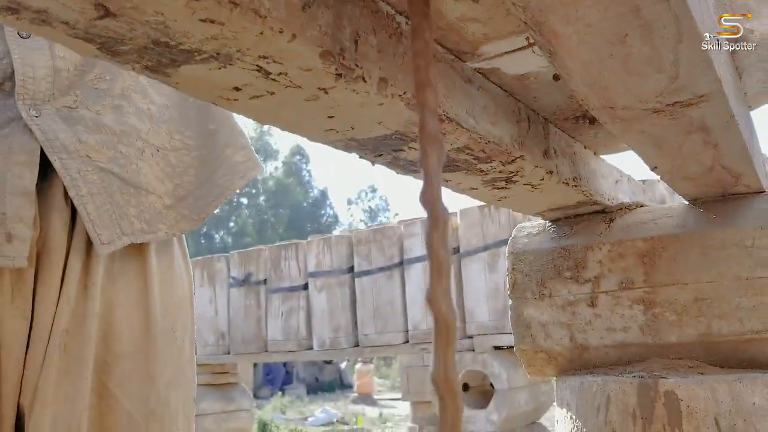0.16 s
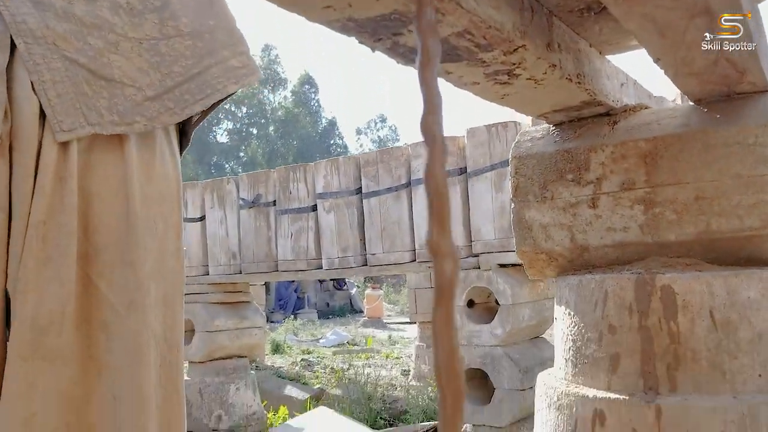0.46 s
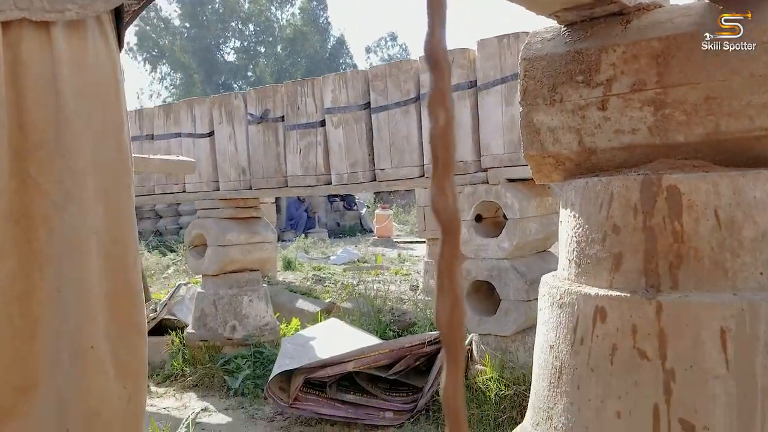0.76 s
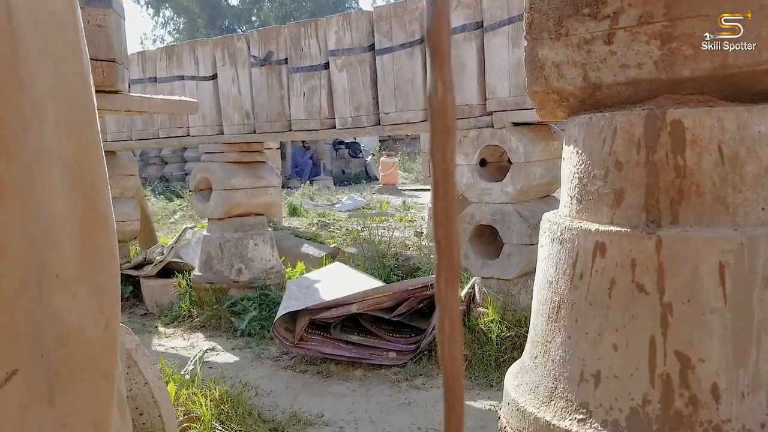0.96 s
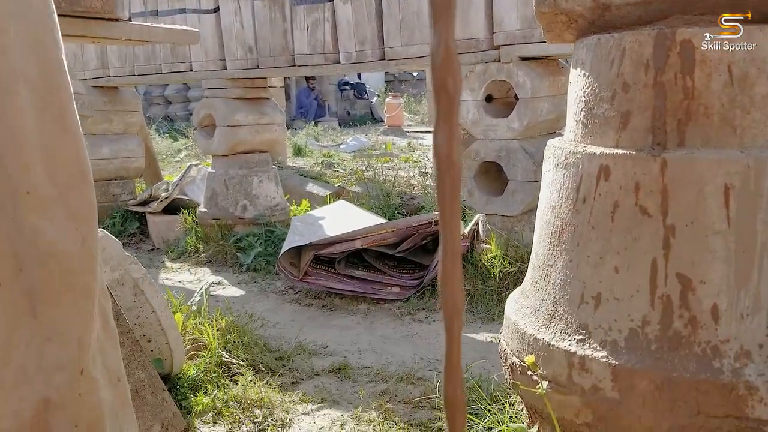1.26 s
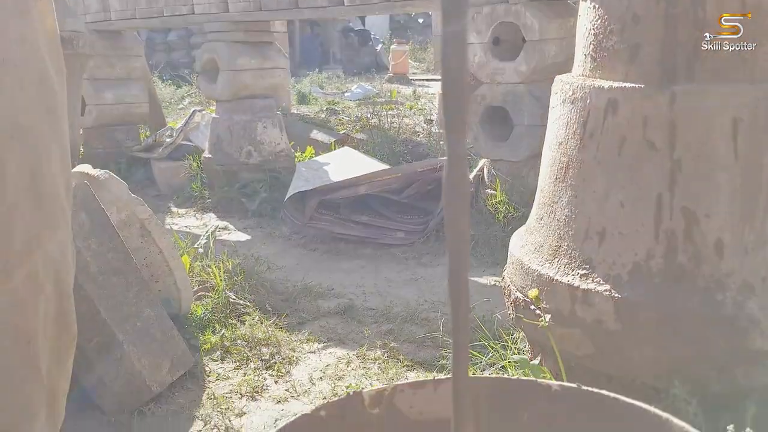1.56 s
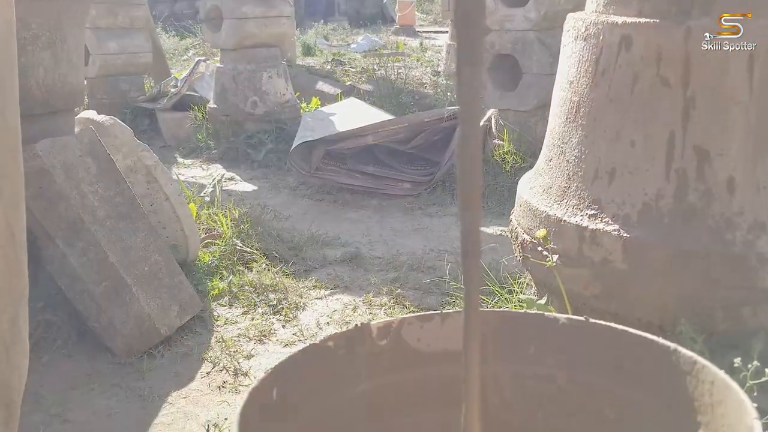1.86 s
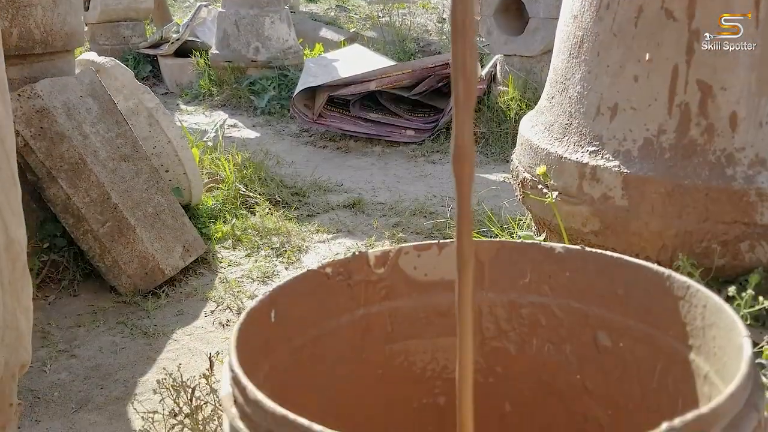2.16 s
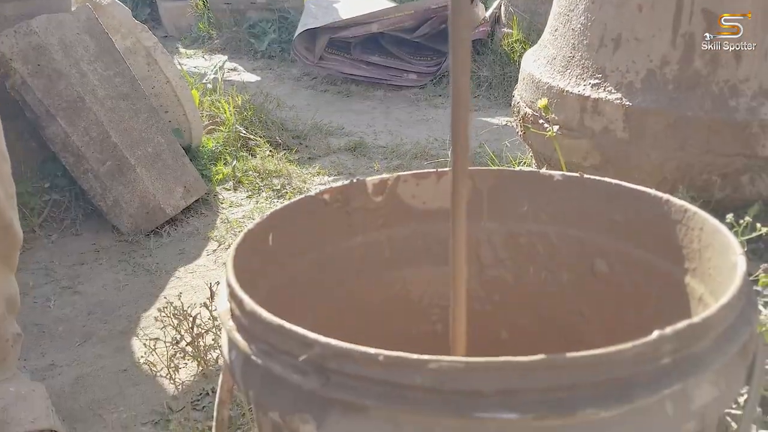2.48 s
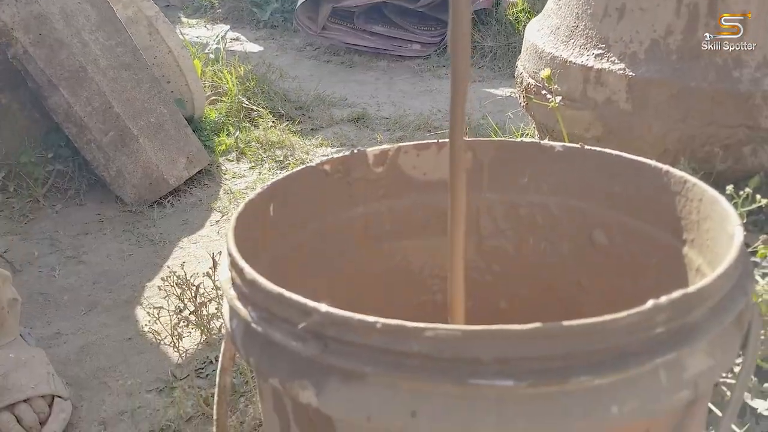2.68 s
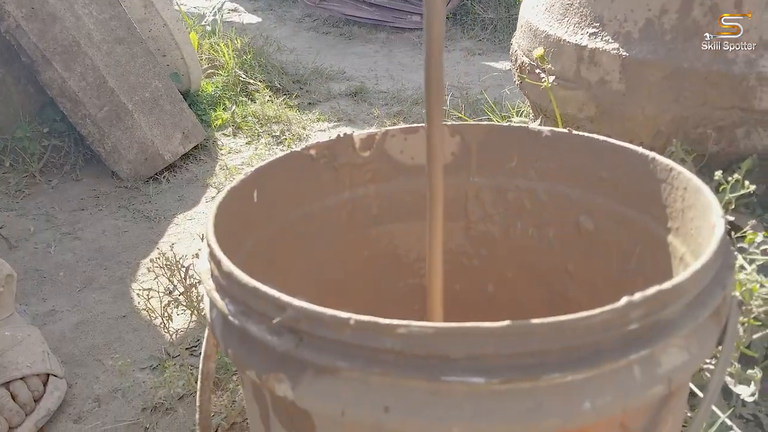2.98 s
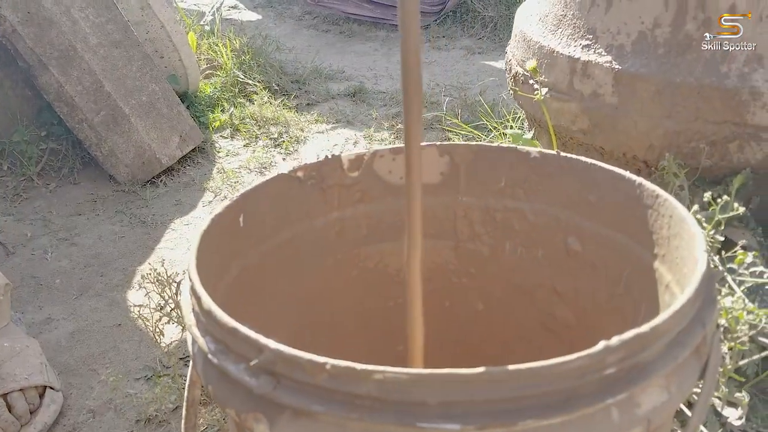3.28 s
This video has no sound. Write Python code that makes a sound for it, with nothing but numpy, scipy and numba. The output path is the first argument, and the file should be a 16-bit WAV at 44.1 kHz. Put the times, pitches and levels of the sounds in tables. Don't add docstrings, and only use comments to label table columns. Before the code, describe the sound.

A falling rope of runny clay splatters and gurgles in a hollow bucket, growing steadily closer

```python
import sys
import numpy as np
from scipy import signal
from scipy.fft import rfft, irfft
from scipy.io import wavfile
from scipy.ndimage import uniform_filter1d
from numba import njit

SR = 44100
rng = np.random.default_rng(int(sys.argv[2]) if len(sys.argv) > 2 else 0)


def amplitude_ratio(level_db):
    exponent = np.asarray(level_db, float) / 20
    return 10 ** exponent


def master_out(mix):
    frames = np.transpose(np.atleast_2d(mix))
    ceiling = np.clip(frames, -1, 1)
    pcm = np.round(ceiling * 32767).astype(np.int16)
    wavfile.write(sys.argv[1], SR, pcm)


N = 151263


def noise():
    return rng.standard_normal(N)


def unit(x):
    return x / np.sqrt(np.mean(x ** 2))


def curve(table, axis):
    table = np.array(table)
    return np.interp(np.arange(N) / SR, table[:, 0], table[:, axis])


def colour(x, points):
    hz, db = np.array(points).T
    octave = np.log2(np.arange(N // 2 + 1) * SR / N + 1)
    below = np.maximum(np.log2(hz[0]) - octave, 0)
    above = np.maximum(octave - np.log2(hz[-1]), 0)
    gain_db = np.interp(octave, np.log2(hz), db) - 11.8 * (below + above)
    return irfft(rfft(x) * amplitude_ratio(gain_db), N)


def ring(x, modes):
    return sum(amplitude_ratio(db) * signal.lfilter(*signal.iirpeak(hz, hz / w, SR), x) for hz, w, db in modes)


def peak(x, hz, width_hz):
    b, a = signal.iirpeak(hz, hz / width_hz, SR)
    return signal.lfilter(b, a, signal.lfilter(b, a, x))


def walk(rate_hz):
    hold = int(SR / rate_hz)
    steps = np.repeat(rng.standard_normal(N // hold + 1), hold)
    return unit(uniform_filter1d(uniform_filter1d(steps, hold), hold)[:N])


def burst(at_s, db, decay_s):
    kick = np.zeros(N)
    kick[(at_s * SR).astype(int)] = amplitude_ratio(db)
    return signal.lfilter(np.ones(60) / 60, [1, -np.exp(-1 / (decay_s * SR))], kick)


@njit
def grains(n, at, step, decay, rise, size):
    y = np.zeros(n)
    for k in range(len(at)):
        level, phase, turn, i, soft = size[k], 0., step[k], at[k], 1.
        while level > size[k] * .01 and i < n:
            y[i] += level * (1 - soft) * np.sin(phase)
            phase += turn
            turn = min(turn * rise[k], 2.6)
            level *= decay[k]
            soft *= decay[k] ** 2
            i += 1
    return y


def bubbles(at_s, hz, cycles, size, rise=.1):
    tau = cycles / 2 * SR / hz
    start = (at_s * SR).astype(np.int64)
    climb = (1 + rise) ** (.5 / tau)
    return grains(N, start, 2 * np.pi * hz / SR, np.exp(-1 / tau), climb, 1.77 * size)


def swarm(lo_hz, hi_hz, cycles, scatter_db, count):
    u = rng.random((count, 4))
    hz = lo_hz * (hi_hz / lo_hz) ** u[:, 1]
    size_db = scatter_db * np.minimum(-np.log(1 - u[:, 3]), 3.5)
    return unit(bubbles(u[:, 0] * N / SR, hz, cycles * (.5 + u[:, 2]), amplitude_ratio(size_db) * hz / lo_hz))


# pitch_hz, level_db
RUMBLE = [(20, -30), (33, -16), (48, -13), (62, -2.5), (120, -2), (210, -9), (310, -10), (400, -19)]
# start_s, level_db
GUST = [
    (0, -60),
    (1.6, -69),
    (1.9, -60),
    (2.4, -57),
    (3.43, -61),
]


def rumble():
    gust = unit(peak(noise(), 37, 33)) * amplitude_ratio(curve(GUST, axis=1))
    hiss = unit(ring(noise(), [(1410, 350, 11), (5000, 6000, -12)])) * amplitude_ratio(-58.5)
    machinery = unit(colour(noise() * amplitude_ratio(walk(2.73)), RUMBLE)) * amplitude_ratio(-46)
    return machinery + hiss + gust


# pitch_hz, width_hz, level_db
COLUMN = [(110, 41, 2), (143, 16.4, 6), (182, 30, -2), (296, 11, -4)]
# start_s, level_db
BOOM = [
    (0, -33),
    (.14, -48),
    (.19, -59),
    (.25, -44),
    (.8, -45.5),
    (1.2, -46),
    (2.3, -46),
    (3.43, -47),
]
# start_s, peak_db, pitch_hz
THUDS = [(0.014, -32, 121.4), (0.072, -29, 148.4), (0.121, -34.5, 132), (0.235, -31.5, 125),
         (0.301, -29.5, 119), (0.378, -28.5, 143), (0.447, -30, 139), (0.561, -31.5, 152),
         (0.657, -32.5, 143), (0.71, -31, 127), (0.754, -30, 133.5), (0.941, -32.5, 110),
         (1.571, -31.5, 147), (2.128, -35.5, 123), (2.209, -39, 140), (0.483, -35.5, 132),
         (0.607, -34.5, 138.4), (1.474, -35.5, 140), (1.72, -35.5, 149), (1.964, -46, 116),
         (2.242, -33, 199), (2.29, -36.5, 198)]


def boom():
    hum = ring(ring(noise(), COLUMN), [(131.0, 77, 0.049), (264.0, 36, -1.6)])
    hum = unit(hum) * amplitude_ratio(curve(BOOM, axis=1) + 0.5)
    s, db, hz = np.array(THUDS).T
    thud = bubbles(s, hz, 6.6, amplitude_ratio(db + 0.9), rise=0.012)
    overtone = bubbles(s, 285 + 0 * s, 16.5, amplitude_ratio(db - 11.5), rise=0.016)
    return hum + thud + overtone


# pitch_hz, width_hz, level_db
MOUTH = [(785, 50, -5), (870, 50, -4), (922, 32, 1)]
# pitch_hz, width_hz, level_db
DEEP = [(486, 220, -8), (568, 77, -23), (687, 105, -9), (758, 22, -3.5)]


def slosh(lump, own, far_db):
    drive = noise() * amplitude_ratio(1.6 * lump + 0.65 * own)
    mouth = unit(ring(ring(drive, MOUTH), [(819, 74, 0)]))
    deep = unit(ring(ring(drive, DEEP), [(722, 124, 0)]))
    return mouth + amplitude_ratio(4 - 2.11 * far_db) * deep


# start_s, peak_db
PUFFS = [(0.0154, -29.5), (0.0887, -30.5), (0.3247, -41), (0.373, -31), (0.5237, -31.5), (0.805, -21),
         (0.881, -24.5), (0.9436, -27), (1.01, -23), (1.3473, -21.5), (1.413, -21.5), (1.4676, -38),
         (1.5394, -27), (1.8223, -29), (1.9849, -25.5), (2.7257, -27), (2.7995, -22), (2.9836, -21),
         (3.1258, -35), (3.311, -17.5), (0.1371, -37.5), (0.1932, -40), (0.207, -35), (0.417, -31.5),
         (0.4509, -31), (0.5931, -35.5), (1.1124, -45), (1.2405, -24.5), (1.717, -45), (2.028, -26),
         (2.0951, -37), (2.137, -28.5), (2.8554, -28), (2.9018, -28)]


def puffs():
    return burst(*np.array(PUFFS).T, decay_s=0.0032) * amplitude_ratio(-4)


# pitch_hz, level_db
SPRAY = [(3000, -50), (7000, -9.5), (10000, -0.5), (11500, 5.5), (13500, 8.5), (16500, 4)]
# pitch_hz, level_db
TICK = [(4000, -21), (6500, 1), (9500, -3.5), (12000, 2.5), (16500, 0)]


def spray(lump, own, puff, level_db):
    drops = swarm(5800, 18400, 2.7, 5.0, count=3500) + amplitude_ratio(6.0) * noise()
    fine = unit(colour(drops * amplitude_ratio(1.94 * lump + 2.0 * own), SPRAY))
    return fine * amplitude_ratio(level_db + 0.5) + puff * unit(colour(noise(), TICK))


# pitch_hz, level_db per hertz
SPLASH = [(500, -12.5), (1100, -3.5), (1800, -3), (2700, -2), (4500, -2.5), (6500, -5.5), (8500, -10.5),
          (10000, -18)]


def splash_colour(x):
    return unit(colour(x, SPLASH))


# start_s, peak_db, pitch_hz
GULPS = [(0.012, -29.5, 288.3), (0.013, -42, 490), (0.518, -35.5, 290), (0.25, -28.5, 1850),
         (0.279, -25.5, 2015), (0.35, -30.5, 2020), (0.394, -34, 2070), (0.825, -34, 1320),
         (0.844, -27, 1260), (1.298, -26.5, 1214), (0.6, -33, 1210), (0.999, -26.5, 1670),
         (1.297, -19, 2660), (1.645, -24.5, 880), (1.692, -23, 932), (1.884, -25, 863), (2.1, -18.5, 890),
         (2.296, -23, 883), (2.33, -19.5, 2800), (2.723, -20, 893), (2.875, -21.5, 868), (3.159, -17, 2730),
         (3.232, -20.5, 870), (0.831, -29.5, 856), (1.245, -28, 930), (1.921, -30.5, 747),
         (2.175, -25.5, 877), (2.4, -25.5, 936), (2.67, -21, 907), (2.973, -27, 755), (3.313, -23, 707),
         (3.373, -31.5, 710), (3.415, -26, 813)]


def gulps():
    s, db, hz = np.array(GULPS).T
    return bubbles(s, hz, 14.7, amplitude_ratio(db - 6), rise=0.021)


# start_s, peak_db, bubble pitch_hz
SPLATS = [(0.014, -35.5, 1960), (0.0885, -43, 2700), (0.231, -30, 3760), (0.417, -31, 1940),
          (0.7048, -26.5, 2015), (0.8009, -18.5, 3910), (0.881, -24.5, 3450), (0.9438, -27, 5450),
          (1.137, -19, 3940), (1.1843, -22, 4900), (1.2466, -26.5, 2580), (1.3415, -34, 3480),
          (1.4077, -15.5, 4350), (1.468, -46, 2630), (1.5394, -23.5, 2070), (1.588, -29, 2730),
          (1.6516, -16, 3930), (1.7693, -21, 2470), (1.8934, -27.5, 3720), (1.911, -19.5, 3070),
          (2.0317, -21.5, 2710), (2.106, -19, 2640), (2.1476, -20.5, 3680), (2.188, -21, 3660),
          (2.2772, -19.5, 3600), (2.2935, -17.5, 3600), (2.7978, -22.5, 3620), (2.989, -20.5, 2730),
          (3.047, -32, 4160), (3.309, -15.5, 4270), (0.0266, -32, 2590), (0.1338, -34, 5520),
          (0.196, -36, 4970), (0.389, -30, 5660), (0.478, -35, 5250), (0.5328, -35, 2680),
          (0.5803, -33, 3780), (0.7274, -26, 5770), (0.8425, -28, 4650), (1.077, -29, 3400),
          (1.4955, -32, 5240), (1.9655, -38, 5300), (2.243, -26.5, 3500), (2.5256, -21, 3380),
          (2.8569, -23.5, 2350), (3.126, -21, 4550), (3.2292, -24, 2580), (3.259, -17, 4460),
          (3.297, -22.5, 3740), (3.4143, -22, 4570)]


def splats():
    s, db, hz = np.array(SPLATS).T
    u = rng.random((len(s), 18)).reshape(-1, 6, 3).T
    at_s = s + 0.015 * u[0] ** 2
    pitch_hz = hz * 1.686 ** (u[1] - .45)
    size = amplitude_ratio(db - 8.5 - 7.3 * u[2])
    cluster = bubbles(at_s.ravel(), pitch_hz.ravel(), 18, size.ravel())
    lead = bubbles(s, hz, 26, amplitude_ratio(db - 6), rise=0.064)
    hiss = splash_colour(noise()) * burst(s, db - 13, 0.0089)
    return amplitude_ratio(-2) * (lead + cluster) + hiss


def lumps():
    kicks = (rng.random(N) < 50 / SR) * rng.random(N)
    x = signal.lfilter([1], [1, -np.exp(-1 / (0.0047 * SR))], kicks)
    x = uniform_filter1d(x, size=130)
    x = 2.3 * unit(x - x.mean()) + .5 * walk(20) + 0.62 * walk(60)
    return 1.48 * np.tanh(x / 2.4)


def shared_flow():
    swell = burst(np.array(SPLATS)[:, 0], 0, 0.0049) - 0.15
    return 0.62 * lumps() + 0.8 * swell


# pitch_hz, width_hz, level_db
CROSS = [(1485, 60, 0), (2050, 90, 0), (2335, 70, -0.5), (2620, 90, 4.5), (2805, 70, 2.5), (3375, 70, -1),
         (3700, 100, -2), (4200, 120, 0), (4520, 100, 2), (5570, 300, -7)]


def cross_modes():
    return [(hz, w, amplitude_ratio(db + 1.5 * walk(2.91))) for hz, w, db in CROSS]


# start_s, level_db
BRIGHT = [
    (0, 0),
    (1.5, -0.5),
    (2.1, -1.5),
    (2.5, -5.5),
    (2.9, 0),
    (3.2, -2.5),
    (3.43, 3),
]


def splash(lump, own, cross, far_db):
    cycles, scatter_db = 13.24, 1.5
    low = swarm(711, 2390, cycles, scatter_db, count=1600)
    low = low * amplitude_ratio(0.83 * lump + 0.18 * own[0] + 0.44 * far_db)
    high = swarm(2397, 9890, cycles, scatter_db, count=4000) * amplitude_ratio(1.15 * lump + 1.93 * own[1])
    slap = noise() * amplitude_ratio(1.93 * lump + 1.8 * own[1])
    x = splash_colour(low + amplitude_ratio(8.5) * high + amplitude_ratio(12.5) * slap)
    rung = unit(sum(gain * peak(x, hz, 1.6 * w) for hz, w, gain in cross))
    x = unit(x + amplitude_ratio(-10.6 - 0.25 * far_db) * rung)
    return x + (amplitude_ratio(curve(BRIGHT, axis=1)) - 1) * peak(x, 5060, 8200)


# start_s, splash level_db, mouth in view_db, spray share_db
APPROACH = [(0, -55.5, -10, 7), (.035, -44, -1, -4), (.07, -53, -15, -1), (.13, -51, -13, -4),
            (.18, -54.5, -21, 3), (.26, -49, -24, 0.5), (.62, -46, -15, -4), (.8, -41.5, -11, -4),
            (1.3, -38.5, -7.5, -7), (1.65, -34.5, -7, -9), (2.4, -34, -4, -9.5), (2.95, -31.5, -7, -8),
            (3.3, -31, -9.5, -7.5), (3.43, -31, -7, -5)]


def stream(lump, own, puff, cross):
    db, view_db, spray_db = [curve(APPROACH, axis=k) for k in (1, 2, 3)]
    far_db = db.max() - uniform_filter1d(db, size=9000)
    lump = lump * (1 + 0.12 * far_db)
    wet = amplitude_ratio(-0.05) * splash(lump, own, cross, far_db)
    hollow = amplitude_ratio(view_db - 3.5) * slosh(lump, own[0], far_db)
    return amplitude_ratio(db) * (wet + hollow) + spray(lump, own[2], puff, db + spray_db)


def echo(x):
    n = np.arange(2048)
    scatter = rng.standard_normal(2048) * np.exp(-n / SR / 0.015)
    return signal.fftconvolve(x, scatter / np.sqrt(np.sum(scatter ** 2)))[:N]


# pitch_hz, left over right level_db
LEAN = [(120, -0.8), (250, -5.5), (500, 1), (1400, 1), (2800, 4.5), (6000, 2.5), (10000, 3), (14000, -3.5)]


def lean(x, share):
    return colour(x, [(8.3, 0)] + [(hz, share * db) for hz, db in LEAN] + [(SR / 2, 0)])


# pitch_hz, side over mid level_db
WIDTH = [(35, -19), (65, -16.5), (140, -16.5), (280, -5), (480, -6), (700, -10), (1300, -4.5), (2400, -5.5),
         (5000, -1.5), (12000, 1)]


def scene():
    lump, own = shared_flow(), [lumps() for _ in range(3)]
    big, puff, cross = splats() + gulps(), puffs(), cross_modes()
    column = boom()
    mid = column + rumble() + stream(lump, own, puff, cross) + big
    side = colour(column + rumble() + stream(lump, own, puff, cross) + echo(big), WIDTH)
    turn_db = 0.3 * (np.arange(N) - N / 2) / SR
    left = lean(mid + side, 0.4) * amplitude_ratio(turn_db / 2)
    right = lean(mid - side, -0.4) * amplitude_ratio(-turn_db / 2)
    return np.array([left, right])


def top_cut(x):
    return signal.sosfilt(signal.butter(12, 17020, fs=SR, output="sos"), x)


def record(dry):
    low_pass = signal.ellip(10, .2, 60, 15900, fs=SR, output="sos")
    mix = signal.sosfilt(low_pass, dry)
    return top_cut(mix)


dry = scene()
out = record(dry)
master_out(out)
```